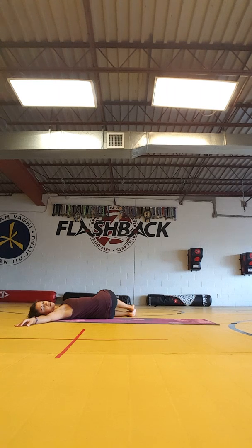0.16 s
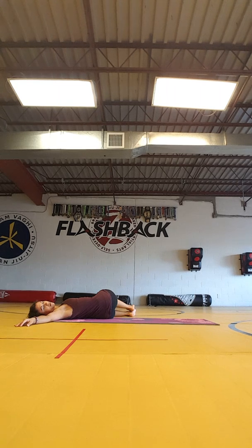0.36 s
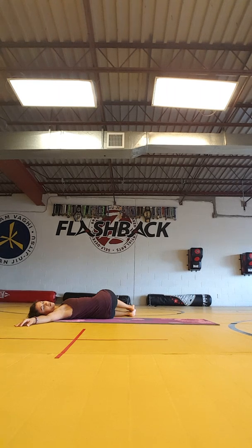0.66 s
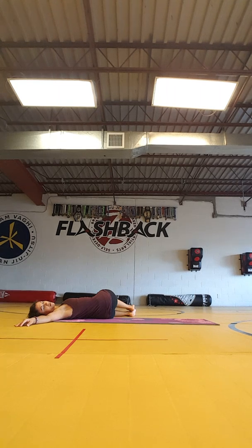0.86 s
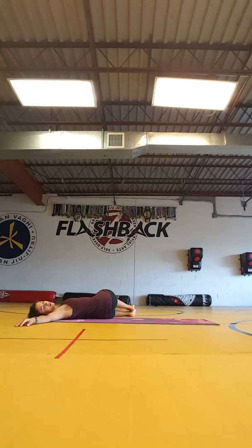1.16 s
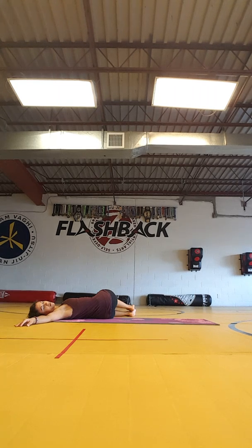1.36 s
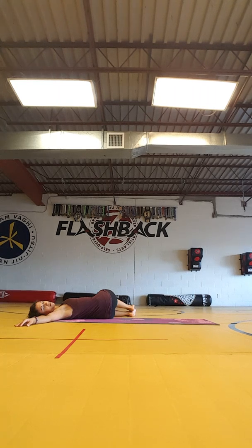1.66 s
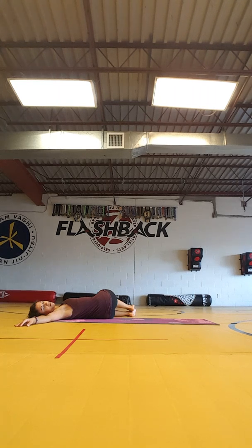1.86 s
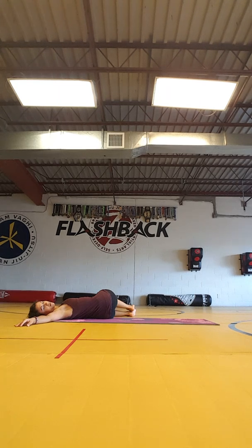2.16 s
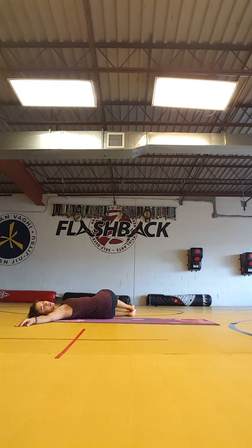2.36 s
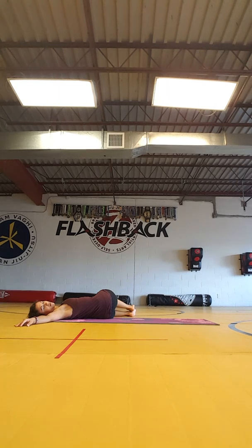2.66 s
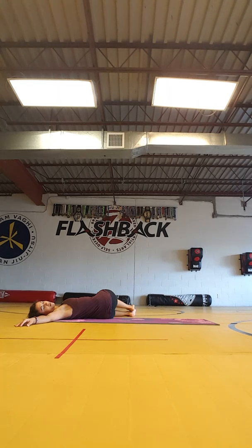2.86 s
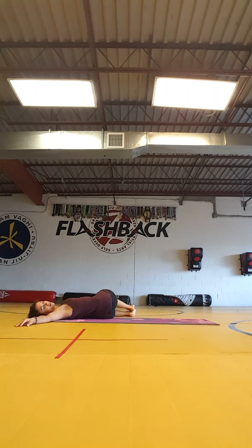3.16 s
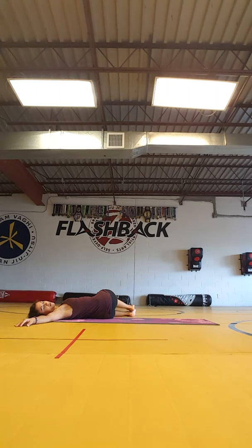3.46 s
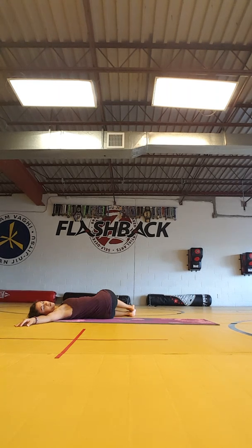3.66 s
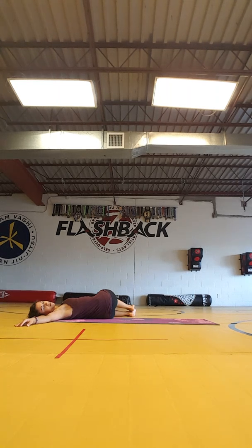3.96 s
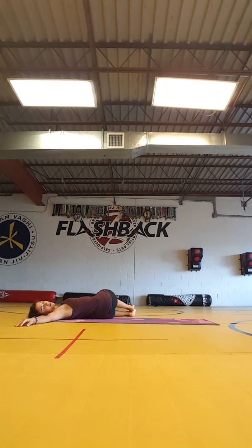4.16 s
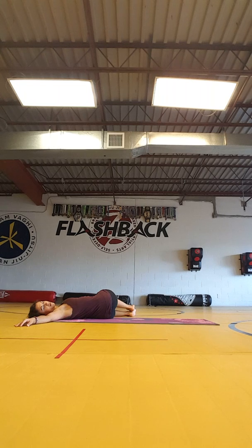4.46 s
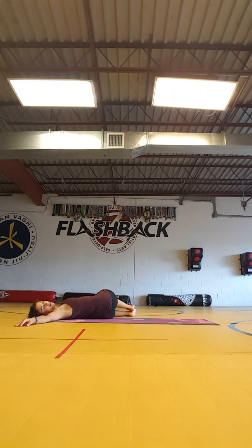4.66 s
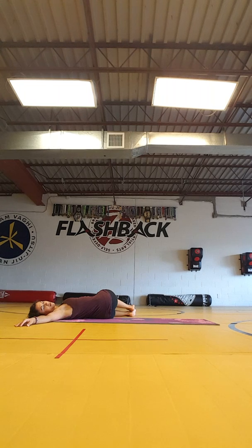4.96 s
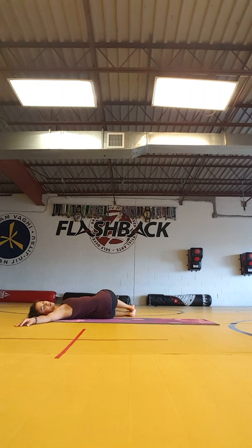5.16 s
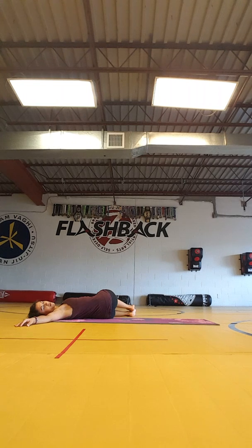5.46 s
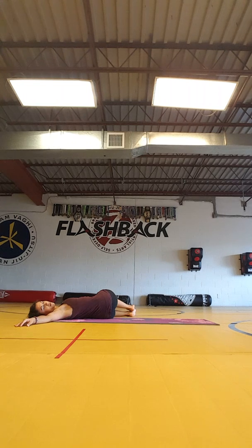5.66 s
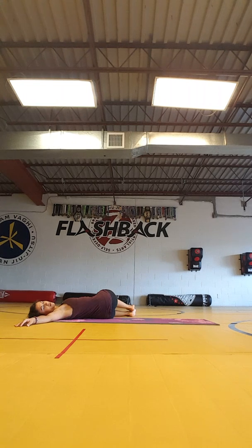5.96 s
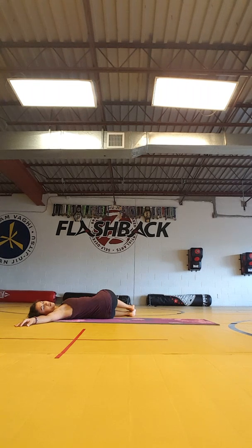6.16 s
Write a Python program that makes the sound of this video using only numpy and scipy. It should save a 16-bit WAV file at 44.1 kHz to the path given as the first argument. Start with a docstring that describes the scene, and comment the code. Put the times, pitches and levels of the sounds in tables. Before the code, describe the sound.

A deep ventilation boom and steady low electrical hum fill a large steel-roofed hall, under a much fainter smooth hiss of air.

```python
"""A deep duct boom fills a large steel-roofed hall, under a smooth hiss of vents and microphone self-noise.
The boom and the hiss are shaped noise; the deepest boom wavers by chance, as narrow noise does.
Two motors, steady sines, beat slowly; a mains hum carries a turning shaft's side tones, beside a thin whine.
A pair of microphones close together hears the bass alike and the hiss apart."""
import sys
import numpy as np
from scipy import signal
from scipy.fft import rfft, irfft, next_fast_len
from scipy.io import wavfile
from scipy.ndimage import uniform_filter1d

SR = 44100
rng = np.random.default_rng(int(sys.argv[2]) if len(sys.argv) > 2 else 0)


def bounce(signal):
    """Save signal as a 16-bit WAV file at the path given by the first command-line argument."""
    frames = np.transpose(np.atleast_2d(signal))
    limited = np.clip(frames, -1, 1)
    pcm = np.round(limited * 32767).astype(np.int16)
    wavfile.write(sys.argv[1], SR, pcm)


def how_loud(loudness_db):
    """Turn decibels into a plain amplitude multiplier (0 dB gives 1, 20 dB gives 10)."""
    steps = np.asarray(loudness_db, float) / 20
    return 10 ** steps


N = 277830  # samples, 6.3 s


def read_table(points, hz):
    """Value of a table at hz, straight lines on a log-frequency axis."""
    table_hz, value = np.transpose(points)
    return np.interp(np.log(hz + 1), np.log(table_hz + 1), value)


def unit_rms(x):
    """Scales to rms 1."""
    return x / np.sqrt(np.mean(x ** 2) + 1e-20)


def tone(hz, level_db, crest_s):
    """A steady sine of the given rms level at each microphone, with a crest at crest_s."""
    t = np.arange(N) / SR
    gain = np.sqrt(2) * how_loud(np.reshape(level_db, (-1, 1)))
    return gain * np.cos(2 * np.pi * hz * (t - crest_s))


# room and duct modes and nulls; the rows above 8 kHz shape microphone self-noise:
# center_hz, width_hz, lift_db (over the noise)
MODES_AND_NULLS = [(84.6, 13.6, 6), (90.5, 9.1, -8), (96.9, 5.3, 3.5), (125.9, 19, 4), (134, 5.5, -8.5),
                   (152.6, 2.9, 5.5), (197.6, 13.3, -8.5), (283, 6, -2.5), (297, 7.2, 6.5), (340, 12, -4.5),
                   (351.6, 8.9, 7), (391, 22, -1.5), (468, 14, 4), (547, 6.5, 6), (558, 6.9, 2),
                   (1212, 9.3, 6.5), (1237, 5.7, 4.5), (1270, 8.9, -1.5), (1370, 10, 1.5), (2970, 350, 0.5),
                   (4170, 130, 3), (10800, 1200, -2), (5230, 1000, 2.5), (9400, 400, 0), (12500, 1000, 2.5)]
# how alike the two microphones hear the noise: freq_hz, likeness (1 = the same, 0 = unrelated)
LIKENESS = [(60, 0.97), (130, 1), (290, 0.95), (640, 0.53), (1410, 0.063), (3100, -0.084), (15000, -0.034)]
# tilt of the stereo picture: freq_hz, left_over_right_db
LEFT_LEAN = [(60, 1.5), (95, 1), (150, 2.5), (240, 1.5), (380, -1.5), (600, -0.5), (950, 1.0), (1500, -1.5),
             (2380, -2.5), (3770, -2), (5980, -1), (9470, 2), (15000, -2.5)]


def paired_noise(spectrum):
    """Noise at the microphone pair: shaped by peaks and nulls, alike on both sides only in the bass."""
    size = next_fast_len(N)
    hz = np.fft.rfftfreq(size, 1 / SR)
    a, b, c, d = rng.standard_normal((len(hz), 4)).T
    left = a + 1j * b
    unrelated = c + 1j * d
    likeness = np.clip(read_table(LIKENESS, hz), -1, 1)
    right = likeness * left + np.sqrt(1 - likeness ** 2) * unrelated
    lifts_db = sum(lift_db / (1 + (2 * (hz - center_hz) / width_hz) ** 2)
                   for center_hz, width_hz, lift_db in MODES_AND_NULLS)
    lean_db = np.outer([.5, -.5], read_table(LEFT_LEAN, hz))
    gain = how_loud(read_table(spectrum, hz) + lifts_db + lean_db)
    noise = irfft(np.array([left, right]) * gain, size)[:, :N]
    return unit_rms(noise)


# colour of the hiss: freq_hz, density_db (per Hz, relative)
AIR_SPECTRUM = [(180, -39), (300, -14.5), (391, -6.5), (563, -7), (611, -6.5), (710, -7.5), (1190, -14.5),
                (1400, -18), (1550, -15.5), (2710, -17.5), (3660, -23.5), (5440, -28.5), (10200, -39.5),
                (12500, -37), (15700, -37)]
# rms depth of a fine fixed ripple on the hiss: freq_hz, depth_db
RIPPLE_DEPTH = [(1500, 1.4), (4000, .8), (13000, .7), (15000, .3)]
RIPPLE_SMOOTHING_HZ = 12
AIR_LEVEL_DB, DRIFT_RMS_DB = -54.5, 0.25


def air():
    """Smooth hiss, drifting slightly, finely rippled: vents, with microphone self-noise above about 8 kHz."""
    size = next_fast_len(N)
    bins = round(RIPPLE_SMOOTHING_HZ * size / SR)
    # the ripple stands for the many upper hall modes
    ripple = rng.standard_normal((size // 2 + 1, 2)).T
    for _ in range(2):
        ripple = uniform_filter1d(ripple, bins)
    ripple_db = read_table(RIPPLE_DEPTH, np.fft.rfftfreq(size, 1 / SR)) * unit_rms(ripple)
    hiss = irfft(rfft(paired_noise(AIR_SPECTRUM), size) * how_loud(ripple_db), size)[:, :N]
    t = np.arange(N) / SR
    # slow sines from 1 to 8 Hz, together one wandering level
    drift = unit_rms(sum(np.sin(2 * np.pi * (f * t + rng.random())) for f in np.geomspace(1, 8, 12)))
    return how_loud(AIR_LEVEL_DB + DRIFT_RMS_DB * drift) * unit_rms(hiss)


MAINS_HUM_HZ, SHAFT_HZ = 120.011, 18.82
# mains hum and its shaft side tones: mains_multiple, shaft_multiple
HUM_ORDERS = [(1, 0), (2, -1), (2, 0), (2, 1), (2, 2), (3, 0), (54, 0), (55, 0), (56, 0)]
# rms levels of those tones, row by row: left_db, right_db
HUM_LEVELS = [(-43, -44), (-41, -44), (-54, -62.5), (-58.5, -64.5), (-70, -79), (-84, -78.5), (-103, -107),
              (-103, -99), (-102, -106)]
WHINE_HZ, WHINE_DB = 1168.34, (-80, -76.7)  # levels left, right


def hum():
    """Mains multiples, the shaft's side tones around the second, and one thin whine."""
    lines = [(mains * MAINS_HUM_HZ + shaft * SHAFT_HZ, level_db)
             for (mains, shaft), level_db in zip(HUM_ORDERS, HUM_LEVELS)]
    lines.append((WHINE_HZ, WHINE_DB))
    return sum(tone(hz, level_db, rng.random()) for hz, level_db in lines)


# hum of each motor: pitch_hz, one per motor
MOTORS_HZ = (59.31, 58.94)
MOTORS_DB = (-41.5, -50)  # rms, midway between the microphones
IN_STEP_S = 1.35  # a moment when both motors push together


def motors():
    """Two motors a little out of step: one hum that beats every few seconds."""
    lean_db = np.array([.5, -.5]) * read_table(LEFT_LEAN, MOTORS_HZ[0])
    return sum(tone(hz, level_db + lean_db, IN_STEP_S) for hz, level_db in zip(MOTORS_HZ, MOTORS_DB))


# duct rumble before the room shapes it: freq_hz, density_db (per Hz, relative)
RUMBLE_SPECTRUM = [(15, -35), (30, -28), (45, -17), (60, -10), (75, -6), (110, -1.5), (140, -10), (190, -9),
                   (230, -13.5), (280, -26.5), (340, -30.5), (500, -65)]
# chance wavering of the deep noise: time_s, gain_db
DEEP_WAVER = [(0, -35), (.4, -40), (1, -35), (2.2, -37.5), (2.8, -34.5), (3.3, -37.5), (4.5, -33),
              (5.2, -37.5), (5.6, -32.5), (6.3, -34.5)]
WAVER_TOP_HZ, UPPER_GAIN_DB = 145, -36  # where the wavering ends, and the steady gain above it


def rumble():
    """Turbulent low boom of the ducts with nothing in the treble; its deepest part wavers by chance."""
    boom = paired_noise(RUMBLE_SPECTRUM + [(1000, -200)])  # silent from 1 kHz up
    lowpass = signal.butter(4, WAVER_TOP_HZ, fs=SR, output="sos")
    deep = signal.sosfiltfilt(lowpass, boom)
    upper = boom - deep
    time_s, gain_db = np.transpose(DEEP_WAVER)
    waver = how_loud(np.interp(np.arange(N) / SR, time_s, gain_db))
    return waver * deep + how_loud(UPPER_GAIN_DB) * upper


def scene():
    """All of the ventilation at once, as the microphone pair gives it."""
    return rumble() + air() + motors() + hum()


def top_cut(x):
    """Nothing passes above the cut-off."""
    return signal.sosfilt(signal.butter(12, 15880, fs=SR, output="sos"), x)


def record(dry):
    """The recorder: a steep treble limit and a small steady offset of the converter."""
    band = signal.firwin(1023, 15745, window=("kaiser", 8), fs=SR)  # low-pass, edge in Hz
    mix = signal.oaconvolve(dry, band[None], "same") - 0.0006
    return top_cut(mix)


dry = scene()
out = record(dry)
bounce(out)
```